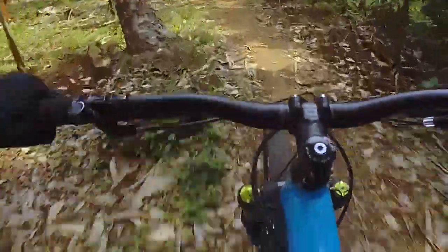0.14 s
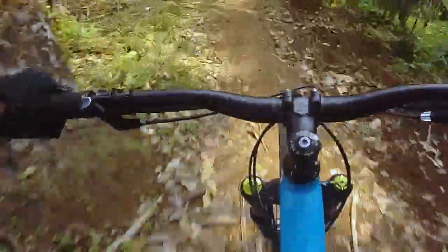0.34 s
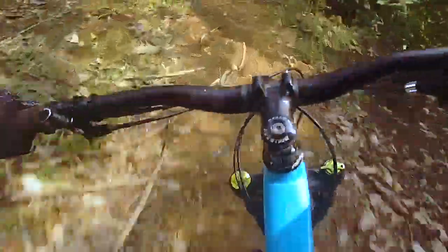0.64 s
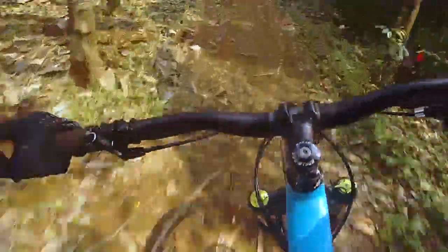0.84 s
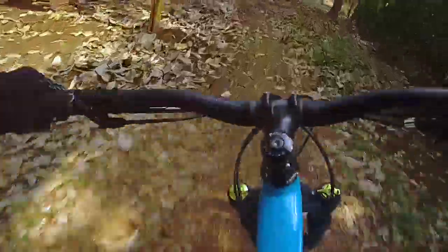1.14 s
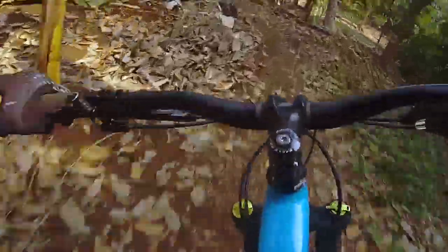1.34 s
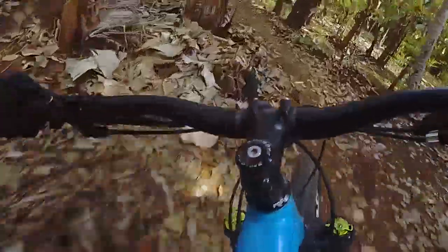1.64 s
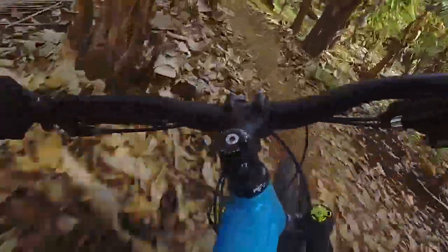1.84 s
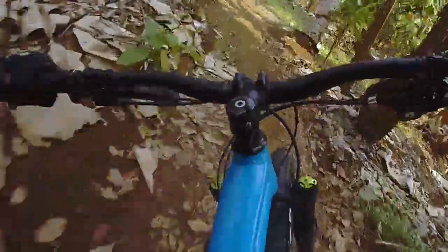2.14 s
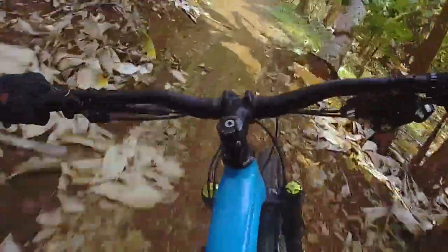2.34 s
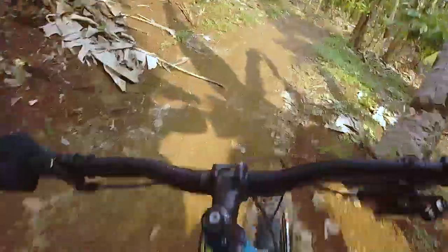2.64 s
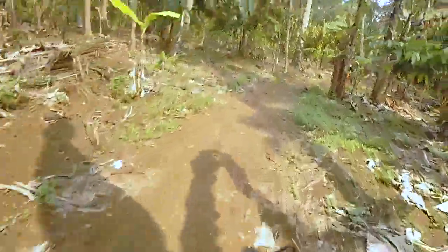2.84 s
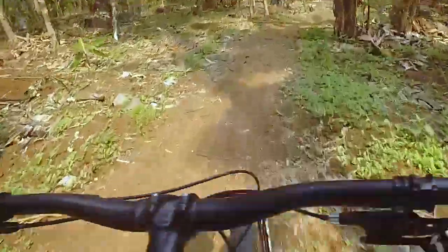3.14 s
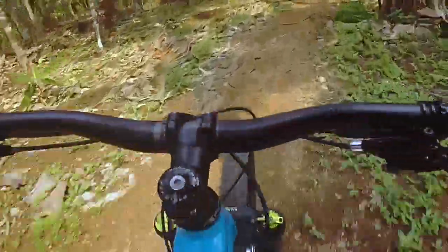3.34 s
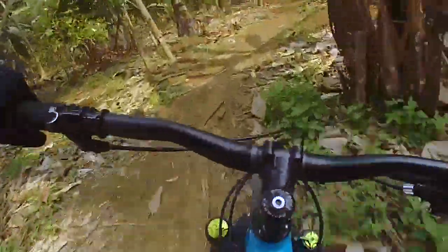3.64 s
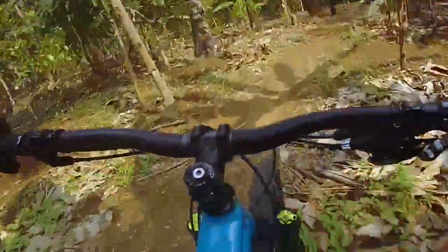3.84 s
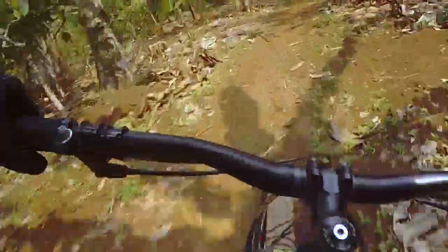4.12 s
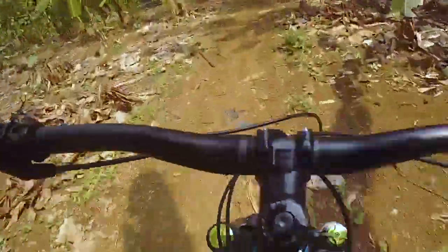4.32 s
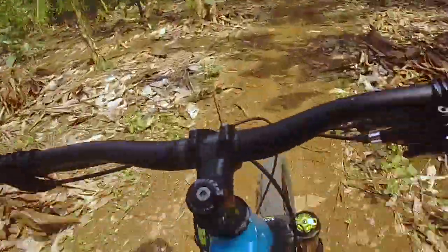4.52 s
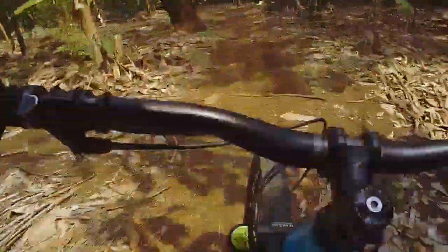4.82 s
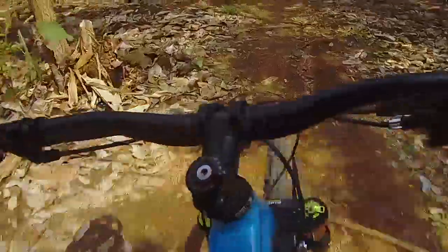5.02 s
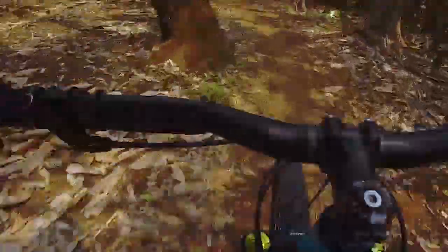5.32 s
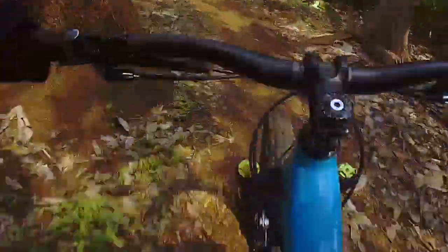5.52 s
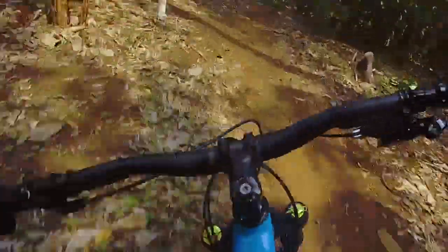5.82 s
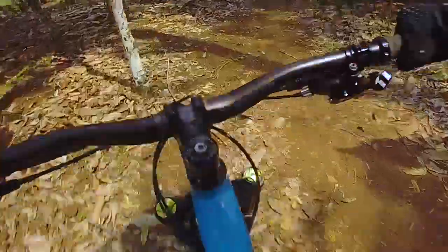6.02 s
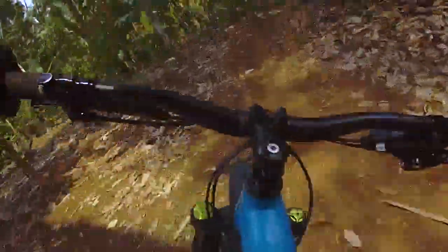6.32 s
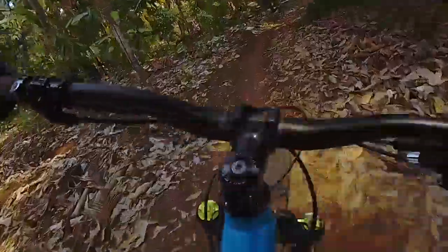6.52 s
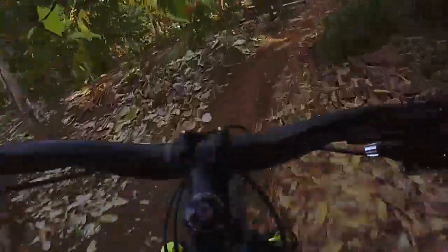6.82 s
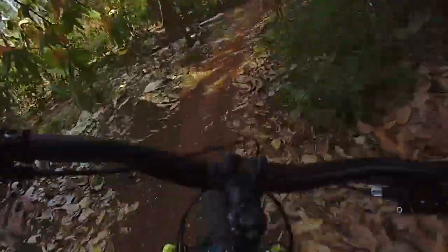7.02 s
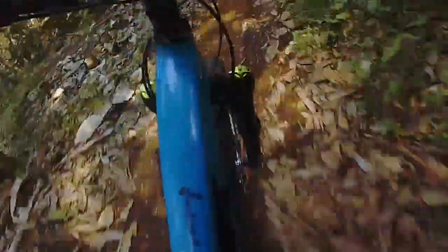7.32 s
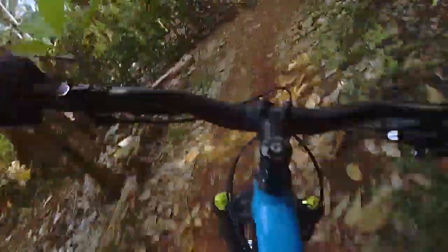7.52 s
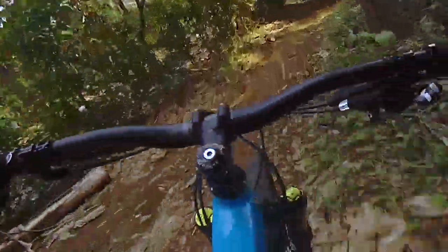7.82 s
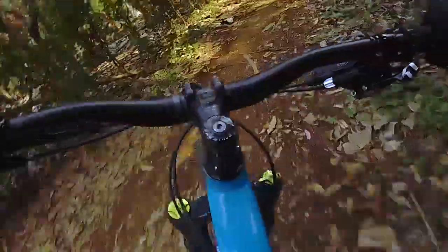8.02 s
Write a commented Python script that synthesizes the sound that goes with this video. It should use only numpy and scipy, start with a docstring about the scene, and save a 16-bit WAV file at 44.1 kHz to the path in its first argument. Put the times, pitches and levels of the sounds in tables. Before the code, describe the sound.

A mountain bike runs down a leafy dirt trail, heard from inside a closed plastic camera case on the rider's chest. Throughout, low wind buffets unevenly and the mount shudders, while muffled tyre roar, dry leaf crackle and small twig snaps come from below with some stereo width. A faint wavering hum sounds in the first half second and returns on and off between 6 and 8 seconds.

The case knocks close and hollow, lightly around 0.5 and 2 seconds. A deep landing thud at 2.7 brings hard knocks, with a loud clatter from 3.2 to 3.4. More thuds come at 4.3 and 4.7, the second with one brief metallic chain slap and a very hard knock. Lighter knocks and short rattles follow, with another thud and knock at 6.8. A loud run of knocks comes from 7.9 to 8.1. The level dips briefly after the hardest blows.

```python
"""A camera's closed shell knocks and shudders in its chest mount as a mountain bike runs down a leafy trail.
The stereo microphones sit inside the shell, so blows carried through the plastic are close and loud,
while tyre roar on dirt, crushed leaves and snapping twigs come muffled from the ground below.
Wind buffets the bass, landings thud, a hum wavers and the chain slaps the frame once.
The recorder's gain control ducks after the hardest knocks."""
import sys
import numpy as np
from scipy import signal
from scipy.fft import rfft, irfft
from scipy.io import wavfile
from scipy.ndimage import uniform_filter1d

SR = 44100
rng = np.random.default_rng(int(sys.argv[2]) if len(sys.argv) > 2 else 0)


def persist_wave(psi):
    """Save psi, clipped to +-1, as 16-bit WAV."""
    counts = np.round(np.clip(psi, -1, 1) * 32767).astype(np.int16)
    wavfile.write(sys.argv[1], SR, np.atleast_2d(counts).T)


N = 359856

# The mount's resonances, lowest first. Each row: frequency in Hz, width in Hz, level in dB.
MOUNT_MODES = [(127.3, 33, 2.5), (186, 67, -5), (313, 120, -9.5)]


def amp(db):
    """Decibels to gain."""
    return 10 ** (np.asarray(db) / 20)


def unit_rms(x):
    """Scales to rms 1."""
    return x / np.sqrt(np.mean(x ** 2) + 1e-20)


def curve_at(points, hz):
    """Reads a spectrum table on a log-frequency axis."""
    f, value = np.transpose(points)
    return np.interp(np.log(hz + 1), np.log(f + 1), value)


def add(mix, s, sound):
    """Mixes a sound in at s seconds."""
    part = mix[..., max(round(s * SR), 0):][..., :sound.shape[-1]]
    part += sound[..., :part.shape[-1]]


def lowpass(x, hz):
    """Passes little above hz, as plastic and padding do."""
    return signal.sosfilt(signal.butter(4, hz, fs=SR, output="sos"), x)


def resonate(x, hz, width):
    """Shifts hz down to zero, smooths, shifts back: a resonance of gain 1."""
    turn = np.exp(2j * np.pi * np.cumsum(hz * np.ones(len(x))) / SR)
    pole = np.exp(-np.pi * width / SR)
    return 2 * (turn * signal.lfilter([1 - pole], [1, -pole], x / turn)).real


def wander(seconds, db):
    """Random gain that wanders over the given time, by db rms."""
    size = int(seconds * SR)
    smooth = uniform_filter1d(uniform_filter1d(rng.standard_normal(N), size), size)
    return amp(db * unit_rms(smooth))


def clicks(per_s, spread_db):
    """Sparse clicks of random sign, a few of them large."""
    size = amp(spread_db * np.minimum(rng.exponential(1, N), 5))
    return size * np.sign(rng.standard_normal(N)) * (rng.random(N) < per_s / SR)


def trail_gain(layer):
    """A layer's gain at every sample on the way down the trail."""
    # Each row: time in seconds, then levels in dB of buffeting, tyre roar and leaf crackle.
    trail_levels = [(0, -31, -45, -41), (0.55, -31, -40, -54), (1.1, -30, -41.5, -63.5),
                    (1.45, -38, -42, -64), (2.1, -33, -42.5, -47.5), (2.5, -37, -45, -57.5),
                    (2.653, -36, -39, -46), (3.877, -30, -52.5, -46.5), (3.939, -34.5, -36, -44),
                    (4.121, -48, -40.5, -42), (4.251, -27.5, -38.5, -99), (4.549, -34.5, -45, -42),
                    (5.2, -35.5, -44.5, -68.5), (6.03, -36.5, -44.5, -50), (6.149, -35, -44, -38.5),
                    (6.451, -39.5, -47.5, -43), (6.6, -29.5, -42.5, -65), (7.2, -40, -48, -47.5),
                    (7.6, -37.5, -40, -49.5), (8.16, -29.5, -40.5, -78)]
    times, *levels = np.transpose(trail_levels)
    db = levels[["buffeting", "tyres", "leaves"].index(layer)]
    return amp(np.interp(np.arange(N) / SR, times, db))


def through_shell(pair, tilt_db):
    """Two unrelated signals reach the microphones partly blended, muffled and tilted by tilt_db an octave."""
    # Outside sound as heard inside the shell. Each row: frequency in Hz, level in dB.
    shell_colour = [(200, 4), (350, -3), (780, -7), (1120, -2), (1350, -14.5), (1680, -26), (1880, -14),
                    (2500, -20), (2750, -31), (3750, -30.5), (4400, -34), (5100, -40.5), (8300, -50),
                    (9500, -48.5), (15500, -73)]
    # How alike the two microphones hear it. Each row: frequency in Hz, likeness from 0 to 1.
    stereo_likeness = [(1500, 1), (2500, 0.83), (5000, 0.2)]
    a, b = rfft(pair)
    alike = np.clip(curve_at(stereo_likeness, np.fft.rfftfreq(N, 1 / SR)), 0, 1)
    ports = irfft([a, alike * a + np.sqrt(1 - alike ** 2) * b], N)
    hz = abs(np.fft.fftfreq(4096, 1 / SR))
    colour_db = curve_at(shell_colour, hz) + tilt_db * np.log2(hz / 1000 + .1)
    log_gain = np.log(amp(np.maximum(colour_db, -100)))
    minimum_phase = np.exp(np.conj(signal.hilbert(log_gain)))
    taps = np.fft.ifft(minimum_phase).real[:2048]
    return signal.oaconvolve(ports, taps[None])[:, :N]


def hum():
    """A faint, narrow tone that wavers in pitch and level and fades in and out."""
    # One list for each stretch of hum. Each row: time in seconds, pitch in Hz.
    pitch_paths = [
        [(0, 545), (.15, 415), (.3, 456), (.55, 420)],
        [(6.15, 350.5), (6.22, 430), (6.42, 365), (6.59, 351.6)],
        [(6.94, 463.3), (7.09, 415), (7.26, 348.3), (7.37, 452), (7.52, 405), (7.69, 429.5), (7.75, 351),
         (7.86, 440.8)],
    ]
    levels_db, fade_s, waver_share = [-39.5, -42, -40.5], 0.011, 0.04
    out = np.zeros(N)
    for path, db in zip(pitch_paths, levels_db):
        s, hz = np.transpose(path)
        t = np.arange(s[0], s[-1], 1 / SR)
        waver, swell = lowpass(rng.standard_normal((2, len(t))), 25)
        pitch = np.interp(t, s, hz) * (1 + waver_share * unit_rms(waver))
        tone = np.sin(2 * np.pi * np.cumsum(pitch) / SR) * amp(2 * unit_rms(swell))
        fade = np.clip(np.minimum(t - s[0], s[-1] - t) / fade_s, 0, 1)
        add(out, s[0], amp(db) * fade * unit_rms(tone))
    return out


def wind():
    """Lumpy wind pressure right on the shell, heard in the bass."""
    gusts = rng.standard_normal(N) * wander(.05, db=5.5)
    rumble = signal.sosfilt(signal.butter(3, [24, 120], "band", fs=SR, output="sos"), gusts)
    return trail_gain("buffeting") * unit_rms(rumble)


def tyres():
    """Tyre knobs on the dirt below: a dense roar with a light flicker."""
    flicker = wander(.006, db=2.6)
    grit = rng.standard_normal((2, N)) * flicker * wander(.067, db=1.3)
    return amp(5) * unit_rms(through_shell(grit, tilt_db=0)) * trail_gain("tyres")


def leaves():
    """Dry leaves and twigs under the tyres: clumps of crackle, and brief snaps that ring the shell."""
    # Each row: start of a snap in seconds, level in dB.
    snap_events = [(0.153, -41), (0.3365, -37), (0.5646, -36.5), (0.624, -40), (0.7746, -49), (0.932, -36),
                   (0.9905, -40), (1.226, -40.5), (1.312, -36.5), (1.342, -40.5), (2.3607, -39),
                   (2.596, -43.5), (3.003, -40), (3.087, -42), (3.142, -40), (3.468, -34), (3.55, -44.5),
                   (3.624, -43), (3.667, -41.5), (3.773, -39), (3.929, -38), (4.068, -39), (4.305, -38.5),
                   (4.385, -43), (4.525, -38.5), (4.636, -37.5), (4.8415, -36), (4.907, -33.5),
                   (5.2287, -39), (5.4812, -39.5), (6.29, -46), (6.378, -39), (6.459, -39.5),
                   (6.7448, -39.5), (6.8675, -41), (6.908, -38), (7.0397, -34), (7.058, -41), (7.268, -40),
                   (7.386, -44), (7.523, -42.5), (8.097, -34)]
    fizz = rng.standard_normal((2, N))
    crackle = np.array([clicks(per_s=3000, spread_db=3.7) for _ in range(2)]) * wander(0.013, db=4)
    crackle = amp(3) * unit_rms(through_shell(crackle, tilt_db=2.47)) * trail_gain("leaves")
    t = np.arange(900) / SR
    snap_shape = (1 - np.exp(-t / 0.0001)) * np.exp(-t / 0.0041)
    envelope = np.zeros(N)
    for s, db in snap_events:
        add(envelope, s, amp(db) * snap_shape)
    snaps = fizz * envelope
    drift = wander(.03, db=.4)  # each snap rings a little higher or lower
    ring = [7 * resonate(x, 1900 * drift, 110) + 3.5 * resonate(x, 3780 * drift, 810) for x in snaps]
    return crackle + through_shell(snaps + ring, tilt_db=6.1) / np.std(through_shell(fizz, tilt_db=9.1))


def chain():
    """The chain slaps the frame below the rider: a brief, rough metallic ring."""
    # Each row: start in seconds, level in dB.
    slaps = [(4.6538, -29.5)]
    ring_hz, width_hz, rise_s = 2290, 480, 0.005
    out, t = np.zeros(N), np.arange(1200) / SR
    envelope = t / rise_s * np.exp(1 - t / rise_s)
    for s, db in slaps:
        band = resonate(rng.standard_normal(len(t)), ring_hz, width_hz)
        ring = unit_rms(resonate(band, ring_hz, width_hz))
        add(out, s, amp(db) * ring / 2 * envelope)
    return out


def shudder():
    """Small jolts keep the loose mount resonating; it rises and falls with the buffeting."""
    jolts = unit_rms(clicks(per_s=350, spread_db=2.94)) + 0.73 * rng.standard_normal(N)
    drive = lowpass(jolts * wander(0.024, db=4.7), 592)
    shaking = sum(amp(db) * resonate(drive, hz, width) for hz, width, db in MOUNT_MODES)
    return amp(-3) * trail_gain("buffeting") * unit_rms(shaking)


def rattles():
    """The loose mount and hollow shell shiver: uneven rings lasting a few hundredths of a second."""
    # Each row: centre in seconds, level in dB, pitch in Hz.
    shivers = [(0.365, -22.5, 203), (0.458, -26, 962), (1.177, -24, 204), (1.364, -32, 970),
               (2.392, -22, 302), (2.642, -15.5, 186), (3.095, -21.5, 265), (4.065, -28, 1133),
               (4.256, -18.5, 373), (4.522, -16, 213), (4.594, -17.5, 265), (5.341, -16.5, 211.4),
               (5.428, -18.5, 343.8), (5.638, -18, 246), (6.097, -21, 199), (6.155, -15, 192),
               (6.514, -24.5, 222), (6.568, -27.5, 206), (6.747, -20.5, 184), (7.334, -24, 234)]
    out, t = np.zeros(N), np.arange(-2000, 2000) / SR
    for s, db, hz in shivers:
        rough = lowpass(resonate(rng.standard_normal(len(t)), hz, 290), 1170)
        phase = 2 * np.pi * (hz * t + rng.random())
        wobble = 1.41 * unit_rms(uniform_filter1d(rng.standard_normal(len(t)), 600))
        ring = lowpass(np.sin(phase + wobble), 1170) + hz / 1100 * unit_rms(rough)
        envelope = np.exp(-(t / 0.014) ** 2 * (1 + hz / 1000))  # high rattles are shorter
        add(out, s + t[0], amp(db) * ring * envelope)
    return out


def landings():
    """The rider's body takes a landing: a deep thud just behind the microphones."""
    # Each row: centre in seconds, level in dB, pitch in Hz.
    thuds = [(2.739, -4.5, 56), (3.704, -19.5, 42.3), (4.326, -12, 50.5), (4.659, -7, 64.2),
             (5.632, -17, 44), (6.768, -9.5, 43.5)]
    out = np.zeros(N)
    for s, db, hz in thuds:
        t = np.arange(-2 / hz, 2 / hz, 1 / SR)
        envelope = np.exp(-(t * hz / 0.62) ** 2)
        add(out, s + t[0], -amp(db) * np.cos(2 * np.pi * hz * t) * envelope)
    return out


def crack(blow_db):
    """A very short burst of treble on each knock, much stronger on hard blows."""
    t = np.arange(400) / SR
    burst = rng.standard_normal(len(t)) * np.exp(-t / 0.0013)
    treble = signal.lfilter(*signal.butter(1, [2000, 4500], "band", fs=SR), burst)
    return amp(-38 + 1.9 * blow_db) * treble


def chatter(first, last, db, hz):
    """The shell bounces in its mount: rows for evenly spaced knocks of uneven strength and pitch."""
    bounce_s, spread_db, pitch_share = .008, 6, .25
    times = np.linspace(first, last, max(round((last - first) / bounce_s), 1) + 1)
    weakening, detune = rng.uniform(-1, 1, (len(times), 2)).T
    weakening[0] = 0  # the first is the strongest
    return list(zip(times, db - spread_db * weakening ** 2, hz * (1 + pitch_share * detune)))


def knock(db, hz):
    """One blow: a push and a deep rebound, the slow swing of the mount and the ring of the shell."""
    t = np.arange(1500) / SR
    rebound = np.sin(2 * np.pi * hz * t) * np.exp(-(hz * t / 0.53) ** 2)  # padding stops it in one cycle
    swing_s = 0.0026 * amp(-.6 * min(db, 0))  # light blows ring on
    swing = 0.5 * np.cos(2 * np.pi * 225 * t) * np.exp(-t / swing_s)
    ring = 0.43 * np.sin(2 * np.pi * 1080 * rng.uniform(0.76, 1.104) * t) * np.exp(-t / 0.0018)
    contact_s = 0.00017 * amp(-.25 * db)  # harder blows are shorter
    contact = np.exp(-((t[:120] - .0009) / contact_s) ** 2)
    blow = np.convolve(rebound + swing + ring, contact)
    blow = signal.lfilter(*signal.butter(1, 130, "high", fs=SR), blow)  # the shell springs back past rest
    blow = lowpass(blow, 1350 * amp(max(db, 0) * hz / 1800))  # only hard, quick blows stay bright
    blow = signal.lfilter(*signal.iirnotch(1650, 1.8, SR), blow)  # the hollow shell swallows this band
    rise = np.arange(len(blow)) / SR / 0.0056  # the loose parts shiver on, peaking after 5.6 ms
    rough = resonate(rng.standard_normal(len(blow)), hz * rng.uniform(0.32, 0.78), 130)
    shiver = unit_rms(lowpass(rough, 700)) * rise * np.exp(1 - rise)
    return amp(db) * blow / blow[:200].max() + 0.13 * amp(-abs(db)) * shiver


def shell_knocks():
    """The shell hits its mount, right at the microphones, and rings the mount's upper modes."""
    # Single blows. Each row: time in seconds, level in dB, rebound in Hz.
    blows = [(0.488, -10.5, 520), (1.816, -11.5, 566), (1.9025, -10, 460), (1.994, -16, 443),
             (2.165, -18.5, 310), (2.6754, -14, 422), (2.7811, 1.5, 695), (2.7916, -3, 450),
             (2.8657, -4.5, 915), (2.905, -10, 398), (2.965, -20, 327), (3.1244, -7, 610),
             (3.219, -10, 835), (3.2448, 1.5, 786), (3.2803, 1, 400), (3.2865, 6.5, 810),
             (3.297, -8.5, 450), (3.3386, 6.5, 577), (3.436, -2, 626), (3.6343, -5.5, 646),
             (3.7009, -4, 630), (3.8192, -7, 714), (3.9643, -6.5, 770), (4.2174, -5, 573),
             (4.44, -8.5, 360), (4.699, 9, 515), (4.723, 6, 457), (4.8252, -2, 632), (4.9118, -8, 646),
             (5.0478, -11.5, 586), (5.3112, -13.5, 520), (5.4542, -7, 704), (5.5426, -8.5, 633),
             (5.5981, -10.5, 510), (5.6123, -9, 350), (6.131, -9, 450), (6.3553, -13.5, 430),
             (6.6076, -16, 644), (6.7843, -2, 696), (6.814, -13, 445), (6.909, -19, 490),
             (7.329, -17.5, 440), (7.7983, -12.5, 876), (7.9004, 2, 465), (7.915, -11, 600),
             (8.038, -2.5, 830), (8.0395, 7, 860), (8.055, -2.5, 795), (8.1096, 4.5, 520), (8.116, 10, 594),
             (8.1406, 8, 675)]
    # Quick runs of blows. Each row: first and last time in seconds, level in dB, rebound in Hz.
    runs = [(3.135, 3.143, -9.5, 520), (3.3092, 3.3127, 0.5, 500), (3.348, 3.3736, -2, 423),
            (3.382, 3.3979, 2, 520), (3.8449, 3.8567, -9.5, 660), (4.3385, 4.3455, -6, 308),
            (4.369, 4.3752, -2, 540), (4.736, 4.7503, -7.5, 494.5), (5.506, 5.526, -7, 450),
            (7.9333, 7.9443, -3, 480), (7.957, 7.968, -12, 420), (8.1197, 8.1233, 3, 480)]
    bounces = [bounce for run in runs for bounce in chatter(*run)]
    out = np.zeros(N)
    for s, db, hz in blows + bounces:
        add(out, s - .0014, knock(db, hz))
        add(out, s, crack(db))
    return out + 0.26 * sum(amp(db) * resonate(out, hz, width) for hz, width, db in MOUNT_MODES[1:])


def scene():
    """From the rider's chest: tyres and leaves have width, the rest is mono; the right is a little louder."""
    # Microphone balance. Each row: frequency in Hz, left minus right in dB.
    balance = [(40, -1), (7000, -3)]
    centre = shell_knocks() + landings() + rattles() + shudder() + wind() + hum() + chain()
    stereo = centre + tyres() + leaves()
    left_db = curve_at(balance, np.fft.rfftfreq(N, 1 / SR)) / 2
    return irfft(rfft(stereo) * amp([left_db, -left_db]), N)


def record(dry):
    """Microphone hiss; gain control ducks just after loud knocks; the input saturates; then a band limit."""
    threshold_db, duck_share, lag_s = -12.5, 0.65, .0025
    ceiling, top_hz = .73, 15700
    mic = dry + amp(-83) * rng.standard_normal(dry.shape)
    power_db = 10 * np.log10(abs(uniform_filter1d((mic ** 2).mean(0), 80)) + 1e-12)
    t = np.arange(N) / SR
    fall_db = 60 * t  # the held peak sinks 60 dB a second
    held_db = np.maximum.accumulate(power_db + fall_db) - fall_db
    over_db = np.maximum(held_db - threshold_db, 0)
    late_db = np.interp(t - lag_s, t, uniform_filter1d(over_db, 100))
    ducked = mic / amp(duck_share * late_db)
    saturated = ducked / (1 + (ducked / ceiling) ** 6) ** (1 / 6)
    band_limit = signal.firwin(511, top_hz, window=("kaiser", 9), fs=SR)
    return signal.oaconvolve(saturated, band_limit[None], "same")


dry = scene()
out = record(dry)
persist_wave(out)
```